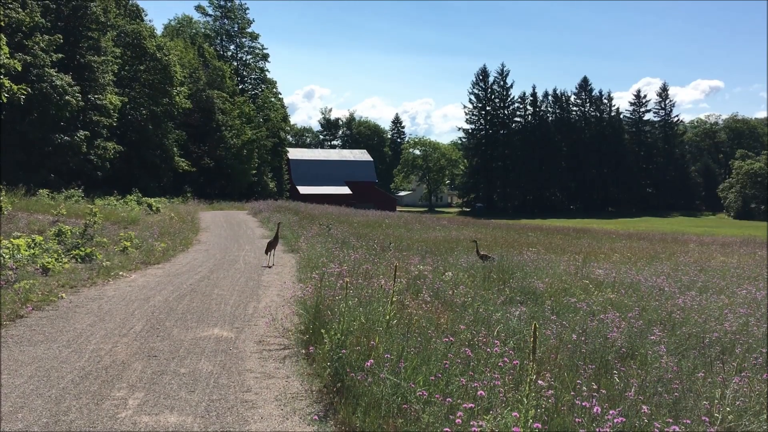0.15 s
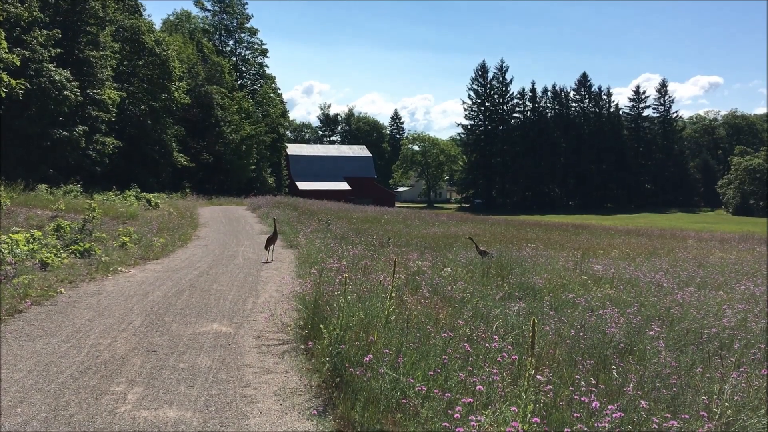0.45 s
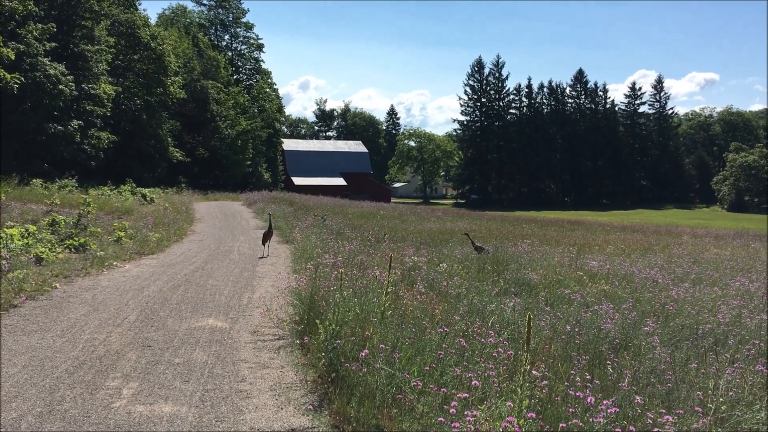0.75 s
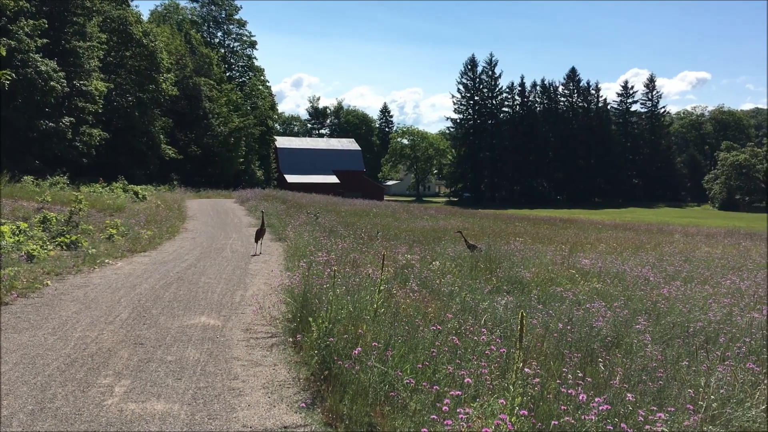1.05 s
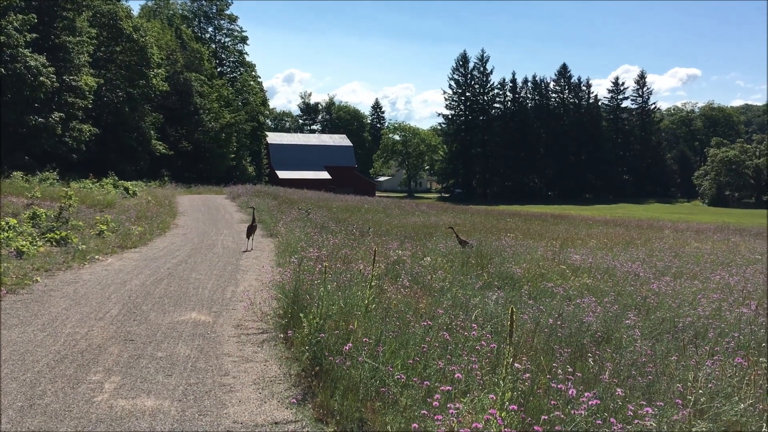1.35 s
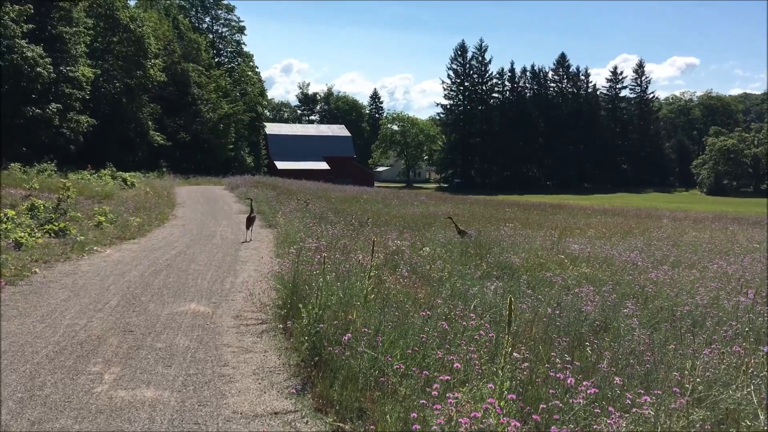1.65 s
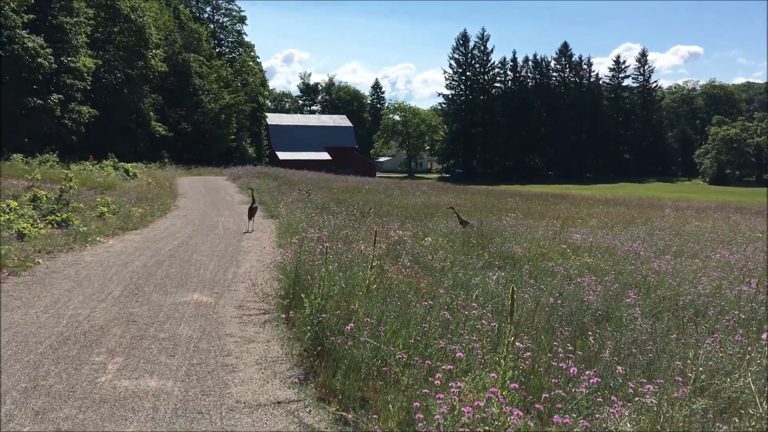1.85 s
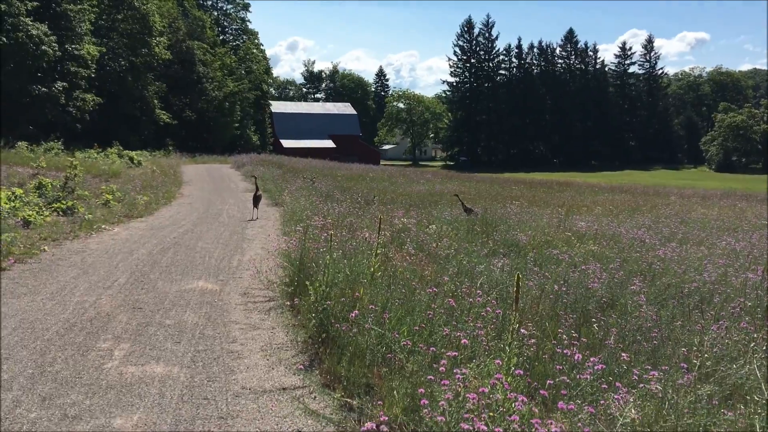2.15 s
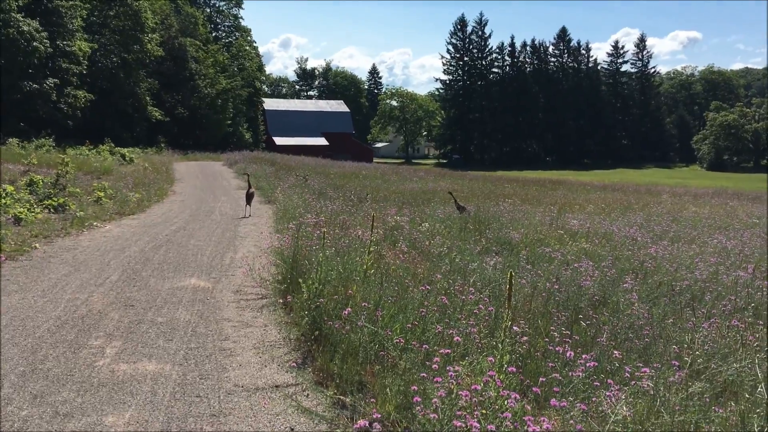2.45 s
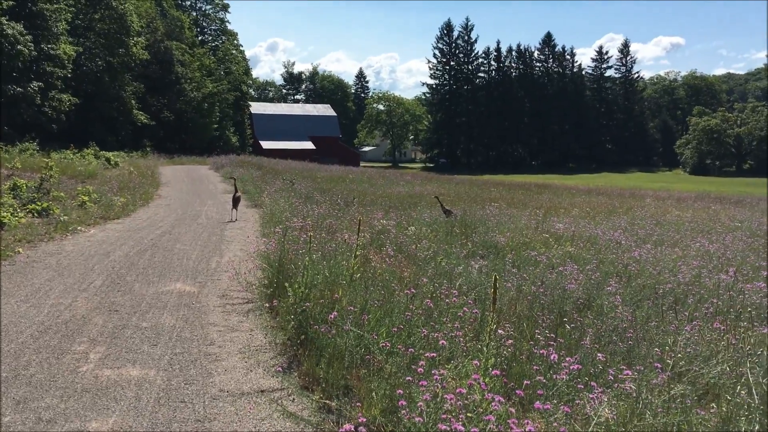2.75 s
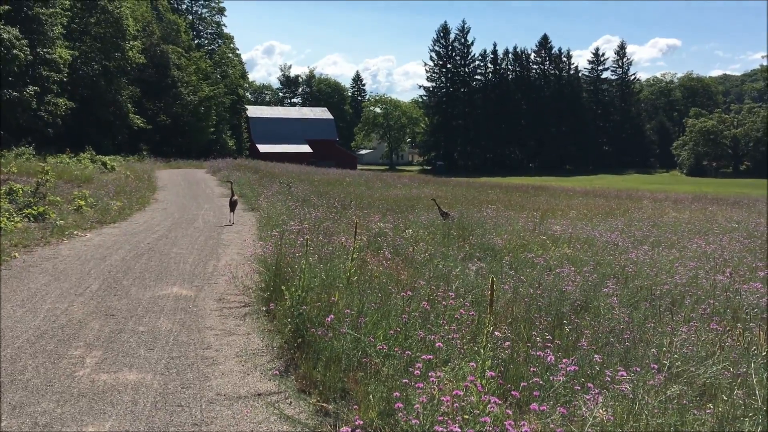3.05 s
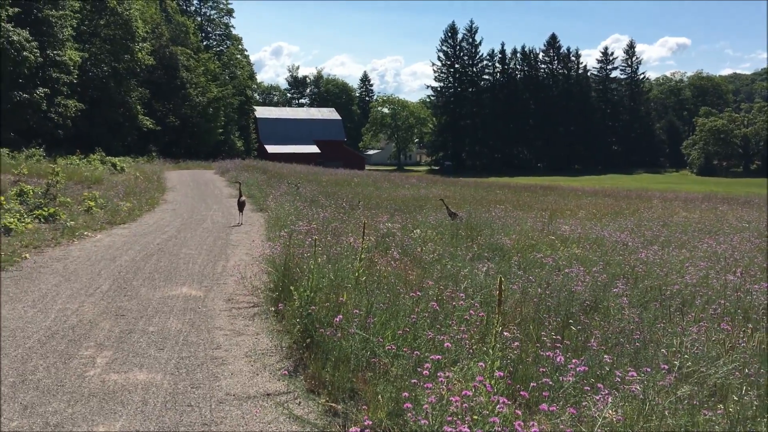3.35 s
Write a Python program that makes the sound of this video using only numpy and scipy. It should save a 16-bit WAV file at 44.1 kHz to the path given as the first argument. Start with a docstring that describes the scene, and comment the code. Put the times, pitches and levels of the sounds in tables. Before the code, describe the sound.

Two cranes call loudly in an open meadow. At the start, one gives a hoarse note and a rolling rattle; a higher one joins at 0.3 seconds, rattling until 0.9 with a short echo. A very faint chirp and distant tone fall in the pause. The pair calls again from about 1.9 to 2.9 seconds. Low wind rumbles on the microphone, gustiest between 1 and 2.3 seconds.

```python
"""Sandhill cranes across an open meadow

Two cranes call in unison, twice. Each opens with a hoarse note, then rattles, every beat a brassy burst
of a few cycles of the syrinx. The lower bird leads; the higher one cuts in with doubled beats. Grass and
trees scatter the calls. A faint tone sounds far off, a small bird chirps, wind buffets the microphone."""
import sys
import numpy as np
from scipy import signal
from scipy.fft import rfft, irfft
from scipy.io import wavfile
from scipy.ndimage import uniform_filter1d

SR = 44100
rng = np.random.default_rng(int(sys.argv[2]) if len(sys.argv) > 2 else 0)


def unload_audio(sound):
    """Save the sound as a 16-bit wav file, at the path given as the first command line argument."""
    columns = np.transpose(np.atleast_2d(sound))
    # keep every value between -1 and 1, then stretch to whole-number steps
    steps = np.round(np.clip(columns, -1, 1) * 32767)
    wavfile.write(sys.argv[1], SR, steps.astype(np.int16))


N = 154350
REBOUND_S, REBOUND_BRIGHT_DB = 0.0083, -0.5  # both birds' rebounds: length, brightness per octave


def amp(db):
    """Decibels to gain."""
    return 10 ** (np.asarray(db) / 20)


def unit_rms(x):
    """Scales to rms 1."""
    return x / np.sqrt(np.mean(x ** 2) + 1e-20)


def at_hz(points, hz):
    """Reads a table on a log-frequency axis."""
    f, value = np.transpose(points)
    return np.interp(np.log(hz + 1), np.log(f + 1), value)


def add(mix, s, sound):
    """Mixes a sound in at s seconds."""
    part = mix[round(s * SR):][:len(sound)]
    part += sound[:len(part)]


def coloured(x, colour):
    """Minimum-phase filter with the given spectrum."""
    gain_db = np.maximum(at_hz(colour, abs(np.fft.fftfreq(4096, 1 / SR))), -100)
    response = np.exp(signal.hilbert(np.log(amp(gain_db))).conj())
    taps = np.fft.ifft(response).real[:2048]
    return signal.fftconvolve(x, taps)[:len(x)]


def noise(colour):
    """Steady noise of rms 1 with the given spectrum."""
    gain = amp(at_hz(colour, np.fft.rfftfreq(N, 1 / SR)))
    return unit_rms(irfft(rfft(rng.standard_normal(N)) * gain, N))


def wobble(n, size):
    """Random wander of rms about 1, smoothed over size samples."""
    return unit_rms(uniform_filter1d(rng.standard_normal(SR), size))[:n]


def swell(length, skew, sharpness):
    """Progress 0-1 through a note and its arch of effort; a skew below 1 peaks early."""
    u = np.arange(0, length, 1 / SR) / length
    return u, abs(np.sin(np.pi * u ** skew)) ** sharpness


def distant_air():
    """The steady hush of open air in the distance."""
    # Spectrum of the hush. Each row: frequency in Hz, level in dB.
    colour = [(100, 14), (400, -5), (900, 4), (1500, 2), (2500, -8.5), (4000, -15.5), (8000, -23.5),
              (16000, -32.5)]
    return amp(-55) * noise(colour)


def wind():
    """Low turbulence at the microphone: a light breeze with short buffets."""
    # The breeze. Each row: time in seconds, level in dB.
    breeze = [(0, -56), (.4, -48), (.95, -58), (1.2, -45), (1.9, -45.5), (2.4, -54), (2.8, -48.5),
              (3.3, -74.5), (3.5, -43.5)]
    # Buffets on the microphone. Each row: peak time in seconds, level in dB, half length in seconds.
    buffets = [(0.025, -43, 0.036), (0.253, -57, 0.044), (0.505, -34.5, 0.021), (0.715, -44, 0.019),
               (1.133, -31, 0.016), (1.22, -40.5, 0.0076), (1.296, -30.5, 0.009), (1.428, -27.5, 0.013),
               (1.559, -32, 0.021), (1.674, -43, 0.09), (1.78, -35, 0.048), (1.914, -35, 0.025),
               (2.045, -28.5, 0.02), (2.13, -37.5, 0.028), (2.243, -30, 0.006), (2.647, -40, 0.017),
               (2.855, -39.5, 0.017), (3.018, -39.5, 0.0062), (3.116, -47, 0.012), (3.466, -44.5, .025)]
    # Spectrum of the rumble. Each row: frequency in Hz, level in dB.
    colour = [(15, -43), (28, -33.5), (45, 0), (80, 1), (130, -7), (200, -14.5), (300, -25.5), (420, -31.5),
              (600, -61), (1200, -88)]
    t = np.arange(N) / SR
    power = amp(np.interp(t, *np.transpose(breeze))) ** 2
    for s, db, half in buffets:
        power += amp(db) ** 2 * np.exp(-((t - s) / half) ** 2)
    eddies = noise(colour)
    steady_eddies = eddies / np.sqrt(uniform_filter1d(eddies ** 2, size=1100) + 0.017)
    return np.sqrt(power) * steady_eddies


def far_tone(start_s=1.42, length_s=0.42, hz=1170, width_hz=65, db=-56):
    """A faint, blurred tone from far off: a narrow band of noise that swells and fades."""
    out = np.zeros(N)
    band = np.exp(-((np.fft.rfftfreq(SR, 1 / SR) - hz) / width_hz) ** 2)
    u, level = swell(length_s, skew=1, sharpness=0.7)
    tone = irfft(rfft(rng.standard_normal(SR)) * band)[:len(u)]
    add(out, start_s, amp(db) * level * unit_rms(tone))
    return out


def small_bird(start_s=1.118, length_s=0.06, from_hz=7100, to_hz=5700, db=-68, waver=0.02):
    """One faint chirp: a wavering whistle that glides down."""
    out = np.zeros(N)
    u, effort = swell(length_s, skew=0.94, sharpness=0.65)
    hz = (from_hz + (to_hz - from_hz) * u) * (1 + waver * wobble(len(u), size=150))
    add(out, start_s, amp(db) * effort * np.sin(2 * np.pi * np.cumsum(hz) / SR))
    return out


def meadow(calls, trees_db=-14.5, trees_rise_s=0.0033, grass_t60_s=0.5, grass_rise_s=0.0067):
    """Bright, quick scatter off the grass and a longer, duller tail from the trees."""
    # Decay among the trees. Each row: frequency in Hz, seconds to fall by 60 dB.
    trees_t60 = [(300, 2.52), (1000, 1.3357), (2000, 1.35), (4000, 1.07), (8000, 0.72), (15000, 1.83)]
    # Colour of the trees' tail. Each row: frequency in Hz, gain in dB.
    trees_colour = [(300, -6), (800, -3), (1200, -4), (1700, -3), (3400, 0), (5000, -3), (9000, -6),
                    (15000, -6)]
    # Colour of the grass scatter. Each row: frequency in Hz, gain in dB.
    grass_colour = [(300, -8.5), (1000, -2.5), (2000, -4.5), (2800, 13.5), (4300, -2.5), (7000, 9.5),
                    (9200, 6.5), (11500, 11.5), (15500, -8.5)]
    # How much the grass scatters. Each row: time in seconds, gain in dB.
    grass_send = [(0, -39), (.3, -2.5), (0.698, -9.5), (1.898, -5.5), (2.15, -4.5), (2.3, -2), (2.5, -5.5),
                  (2.901, -12.5)]
    t = np.arange(2 * SR) / SR
    trees, grass = rng.standard_normal((2, len(t)))
    hz, frame_s, spectra = signal.stft(trees, SR, nperseg=256)
    decay = amp(-60 * frame_s / at_hz(trees_t60, hz)[:, None])
    trees = signal.istft(spectra * decay, SR, nperseg=256)[1][:len(t)]
    trees = coloured(trees * (1 - np.exp(-t / trees_rise_s)), trees_colour)
    grass = coloured(grass * amp(-60 * t / grass_t60_s) * (1 - np.exp(-t / grass_rise_s)), grass_colour)
    send = amp(np.interp(np.arange(N) / SR, *np.transpose(grass_send)))
    tail = amp(trees_db) * signal.fftconvolve(calls, trees / np.linalg.norm(trees))
    scatter = signal.fftconvolve(calls * send, grass / np.linalg.norm(grass))
    return (tail + scatter)[:N]


def bounce(calls, delay_s=0.032):
    """One dull reflection that reaches the microphone close behind each call."""
    # Colour of the reflection. Each row: frequency in Hz, gain in dB.
    colour = [(400, -15.5), (800, 9), (1100, -13.5), (2000, 6), (4000, 0), (15000, -42)]
    out = np.zeros(N)
    add(out, delay_s, amp(-20) * coloured(calls, colour))
    return out


def syrinx(hz, tilt_db):
    """Pulse train on a pitch curve, its harmonics tilted in dB per octave."""
    k = np.arange(1, int(SR / 2 / hz.max()))[:, None]
    harmonics = np.cos(2 * np.pi * k * np.cumsum(hz) / SR)
    return -(amp(tilt_db * np.log2(k)) * harmonics).sum(0)


def windpipe(x, spread_s=0.003, depth_rad=0.97):
    """The long windpipe smears each pulse, delaying neighbouring frequencies unevenly."""
    hz = np.fft.rfftfreq(SR, 1 / SR)
    lag = depth_rad * sum(np.sin(2 * np.pi * hz * spread_s / k) for k in (1, 2.3, 3.7))
    return irfft(rfft(x, SR) * np.exp(-1j * lag))[:len(x)]


def opening_notes(attack_s=0.005, opening_effort=0.59, jitter=0.014, dulling_db=-7):
    """Each crane's rising note starts clean and breaks into third subharmonics and rasp as it swells."""
    # The lower bird's notes. Each row: start and length in seconds, level in dB, first and last pitch
    # in Hz, subharmonics 0-1, rasp 0-1, brightness in dB per octave, skew of the swell.
    low_notes = [(.072, 0.079, -27.5, 462, 547, 0.42, 0.38, 2, 1.31),
                 (1.862, 0.0803, -28.5, 480.1, 542.4, 0.68, 0.32, 3.5, 1.17)]
    # The higher bird's notes, with the same columns.
    high_notes = [(.308, 0.078, -28.5, 209.7, 212.9, 0.16, 0.21, 0, 1.18),
                  (2.285, 0.086, -28.5, 206.9, 210.9, 0.18, 0.45, 0.012, 1.03)]
    # The lower bird's resonances, one table a note. Each row: frequency in Hz, gain in dB.
    low_colours = [
        [(250, -31.5), (500, -7), (750, -1.5), (1050, -4), (1300, -14), (1600, -3), (2080, -8.5), (2350, -25),
         (3200, -18), (4700, -16), (7000, -22.5), (11000, -38), (13500, -34), (15500, -43)],
        [(250, -14), (500, 0), (750, 11.5), (1050, -2), (1300, -6), (1800, 1.5), (2100, -13), (2400, -15.5),
         (3400, -16.5), (4400, -11.5), (7300, -32), (9200, -29.5), (10500, -43.5), (15500, -45)],
    ]
    # The higher bird's resonances for both notes. Each row: frequency in Hz, gain in dB.
    high_colour = [(250, -30), (450, -12), (620, 2.5), (830, 6), (1050, 10), (1280, 9.5), (1500, 9.5),
                   (1900, 8.5), (2150, -0.5), (2500, -25.5), (2900, -21), (3400, -12), (4500, -4),
                   (6200, -10.5), (8000, -35.5), (15500, -34)]
    out = np.zeros(N)
    for note, colour in zip(low_notes + high_notes, low_colours + [high_colour] * 2):
        s, length, db, from_hz, to_hz, split, rasp, bright_db, skew = note
        u, effort = swell(length, skew, sharpness=0.8)
        attack = np.minimum(u * length / attack_s, 1)
        effort = np.maximum(effort, opening_effort * attack * (1 - u))  # the note speaks at once
        glide_hz = from_hz + (to_hz - from_hz) * np.sin(np.pi / 2 * u)
        hz = glide_hz * (1 + jitter * effort * wobble(len(u), size=80))
        phase = 2 * np.pi * np.cumsum(hz) / SR
        voice = unit_rms(syrinx(hz, bright_db + dulling_db * (1 - effort)))
        subharmonics = 2 * split * effort ** 2 * np.cos(phase / 3)
        breath = rasp * effort ** 2 * wobble(len(u), size=1) * (1 + np.cos(phase))
        hoarse = voice * (1 + subharmonics) + breath
        call = windpipe(coloured(hoarse * effort, colour))
        add(out, s, amp(db) * unit_rms(call) * np.sqrt(np.mean(effort ** 2)))
    return out


def beat(length, db, hz, bright_db, sag, jitter=0.025, shimmer=0.15, rasp=0.12, dulling_db=-2.5):
    """A few uneven cycles of the syrinx: brassy at full effort, sagging in pitch as it closes."""
    u, effort = swell(length, skew=0.58, sharpness=1.5)
    pitch = hz * (1 - sag * (2 * u - 0.6) ** 2 + jitter * wobble(len(u), size=40))
    strength = 1 + shimmer * wobble(len(u), size=30) + rasp * wobble(len(u), size=2)
    return amp(db) * effort * strength * syrinx(pitch, bright_db + dulling_db * (1 - effort))


def low_rattle(beat_s=0.01386, sag=0.13, delay_s=0.012, rebound_db=-10.5, rebound_pitch=0.88):
    """The lower crane's beats, each with one weaker, lower rebound, sound through its throat."""
    # Beats at the syrinx. Each row: start in seconds, level in dB, pitch in Hz,
    # brightness in dB per octave.
    beats = [(0.2137, -20.5, 859.6, 0.5), (0.2757, -22, 858.5, -0.5), (.3345, -21.5, 837, -2),
             (.3855, -23, 820, -2), (.4328, -22, 835, -2.5), (.4795, -27, 807, -1.5),
             (.5235, -26.5, 834, -0.5), (.5630, -32.5, 768, -3.5), (2.007, -22.5, 867.5, 1.5),
             (2.0680, -23.5, 859.5, 1.1), (2.1226, -22, 886, 1.5), (2.1725, -23, 857.4, 1.94),
             (2.2174, -23, 847, 1.1), (2.2645, -26, 825, 1.5), (2.3075, -27.5, 746, 0)]
    # Resonances of the throat. Each row: frequency in Hz, gain in dB.
    throat = [(250, -53), (500, 1.5), (680, 7.5), (820, 4.5), (1200, 0.5), (1700, -0.5), (2000, 1),
              (2600, -19.5), (3400, -11.5), (4300, -5.5), (5200, -13.5), (6400, -20), (7700, -28.5),
              (9200, -18.5), (10800, -34), (15500, -28.5)]
    out = np.zeros(N)
    for s, db, hz, bright_db in beats:
        add(out, s, beat(beat_s, db, hz, bright_db, sag))
        add(out, s + delay_s, beat(REBOUND_S, db + rebound_db, hz * rebound_pitch, REBOUND_BRIGHT_DB, sag))
    return coloured(out, throat)


def high_rattle(sag=0.08, rebound_pitch=0.89, second_fade_db=-5.5):
    """The higher crane's beats rebound twice, lower each time, and sound through its throat."""
    # Beats at the syrinx. Each row: start in seconds, level in dB, pitch in Hz, brightness in dB per
    # octave, length in seconds, rebound spacing in seconds, level step per rebound in dB.
    beats = [(0.323, -23, 1260, -17, 0.0069, 0.00447, 0), (0.4478, -16.5, 1171, 3, 0.0077, 0.0063, 1),
             (0.5246, -15, 1167, 1.5, .012, 0.01, -5.5), (0.5905, -15.5, 1165, 1.5, 0.015, 0.0053, -3.5),
             (0.6503, -12.5, 1171, 1.9, 0.0063, .006, -10), (0.7039, -14.5, 1144, 2.5, 0.0067, .006, -10),
             (0.7545, -15.5, 1093, 2.5, 0.0088, .005, -9), (0.802, -19, 996, 3, 0.0074, .005, -6),
             (0.8467, -21.5, 900, 1, 0.007, .006, -41), (2.4303, -17.5, 1185, 1.5, 0.0099, 0.0083, 2),
             (2.5106, -16, 1179, 2.5, 0.01, 0.0075, -1), (2.575, -15, 1194, 2.5, 0.011, 0.0054, -4),
             (2.6311, -15.5, 1167, 2.5, 0.0093, 0.0064, -2.5),
             (2.6877, -15.5, 1172, 2.6, 0.0043, 0.0056, -7), (2.7373, -20.5, 1082, 5, 0.0091, .005, -2.5),
             (2.783, -21.5, 986, 4.5, .009, .005, -5), (2.8285, -26, 879, 2.5, 0.0057, .005, -19)]
    # Resonances of the throat. Each row: frequency in Hz, gain in dB.
    throat = [(300, -42), (600, -11.5), (850, 0.5), (1100, -1), (1500, -0.5), (2100, -9.5), (2800, -26),
              (3500, -19), (4600, -18), (5700, -20), (7000, -30), (8200, -35), (9500, -37), (11000, -44.5),
              (15500, -46)]
    out = np.zeros(N)
    for s, db, hz, bright_db, length, delay, rebound_db in beats:
        add(out, s, beat(length, db, hz, bright_db, sag))
        for k in (1, 2):
            level_db = db + k * rebound_db + (k - 1) * second_fade_db
            rebound = beat(REBOUND_S, level_db, hz * rebound_pitch ** k, REBOUND_BRIGHT_DB, sag)
            add(out, s + k * delay, rebound)
    return coloured(out, throat)


def scene():
    """One microphone in the meadow: both cranes and a small bird over a far tone, wind and air."""
    calls = low_rattle() + high_rattle() + opening_notes() + small_bird()
    return (calls + bounce(calls) + meadow(calls) + far_tone() + wind() + distant_air())[None]


def record(dry):
    """The recorder's band limit cuts the treble above 16.1 kHz."""
    lowpass = signal.firwin(511, 16100, window=("kaiser", 9), fs=SR)
    return signal.oaconvolve(dry, lowpass[None], "same")


dry = scene()
out = record(dry)
unload_audio(out)
```